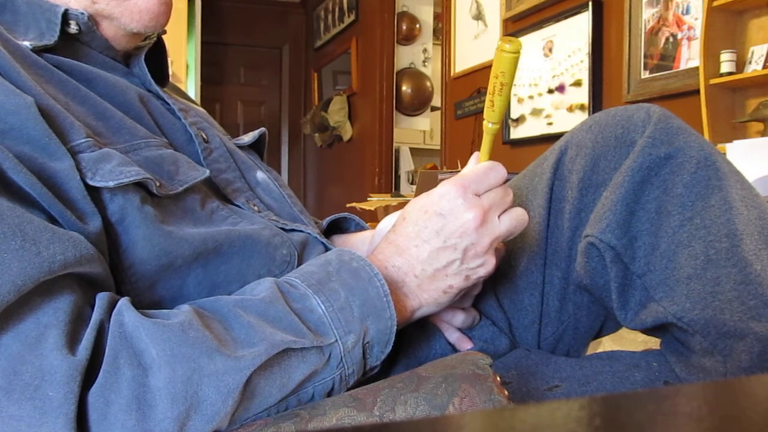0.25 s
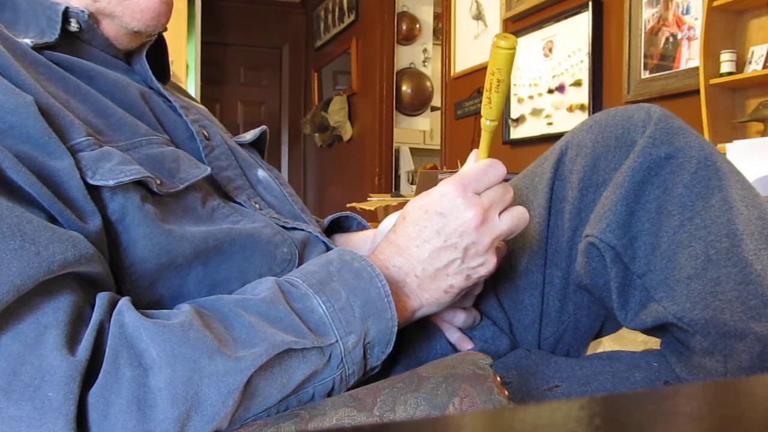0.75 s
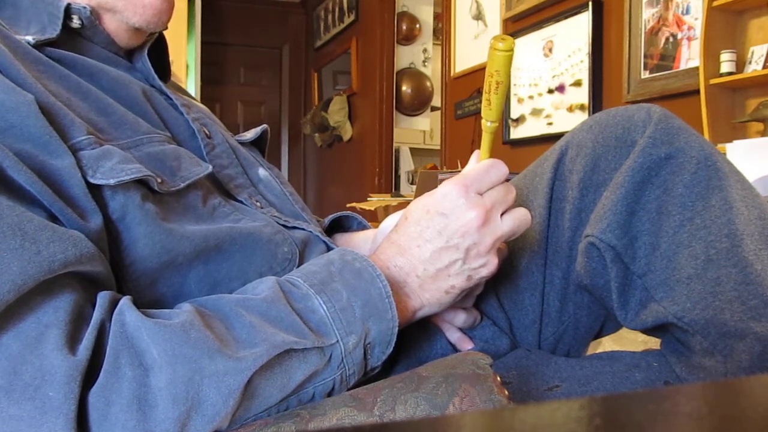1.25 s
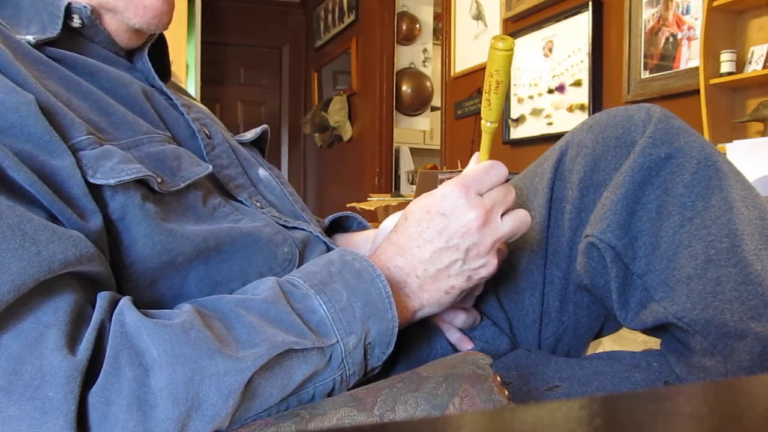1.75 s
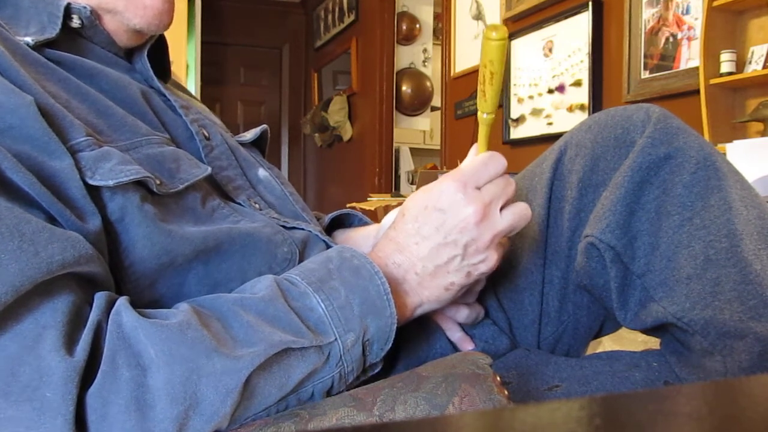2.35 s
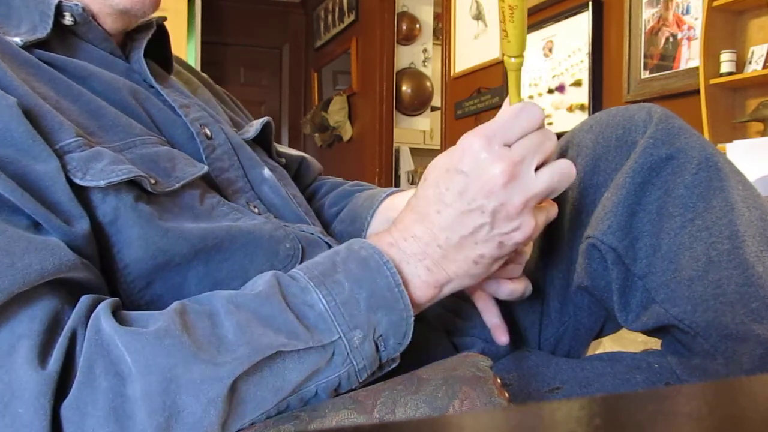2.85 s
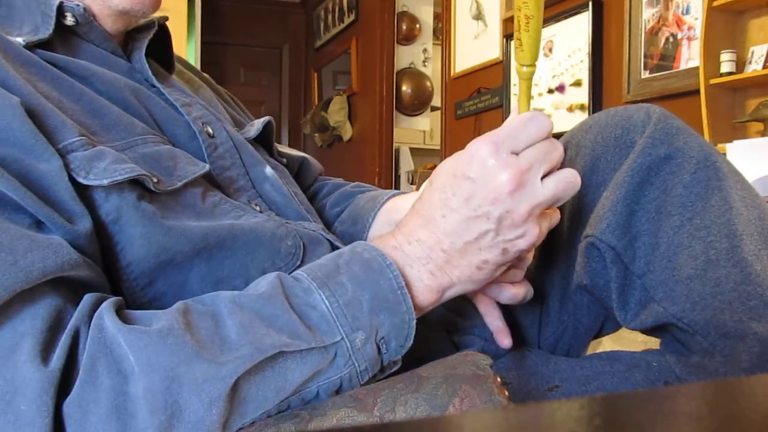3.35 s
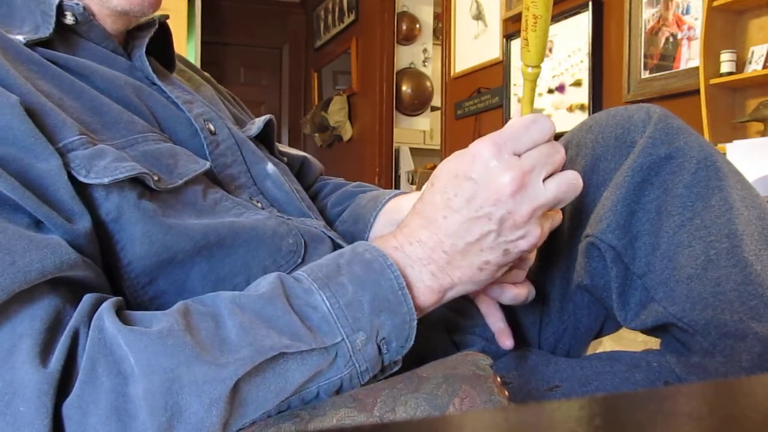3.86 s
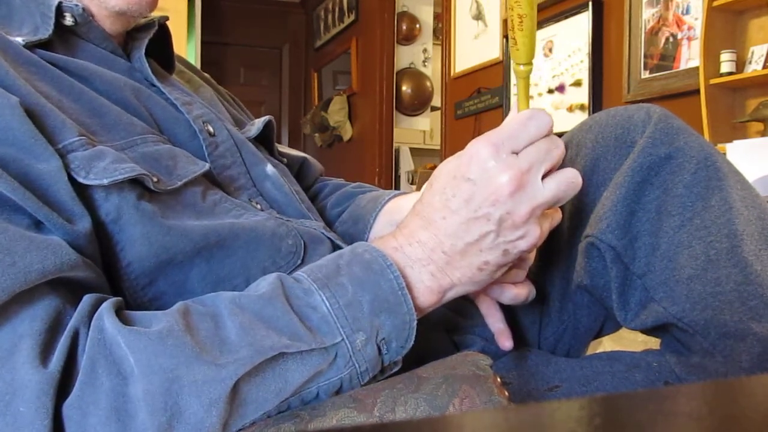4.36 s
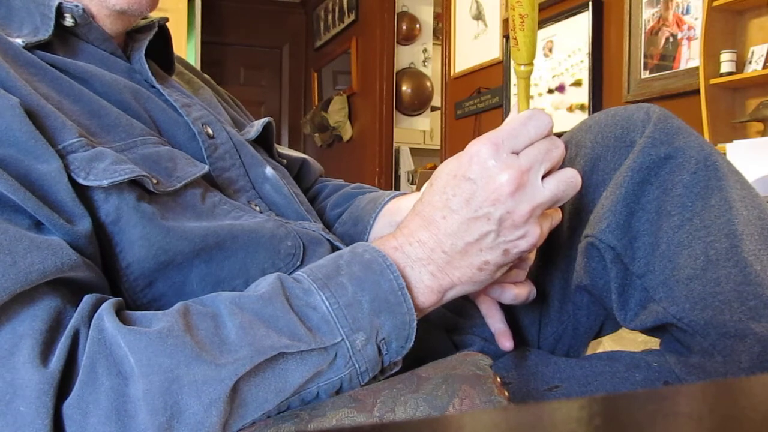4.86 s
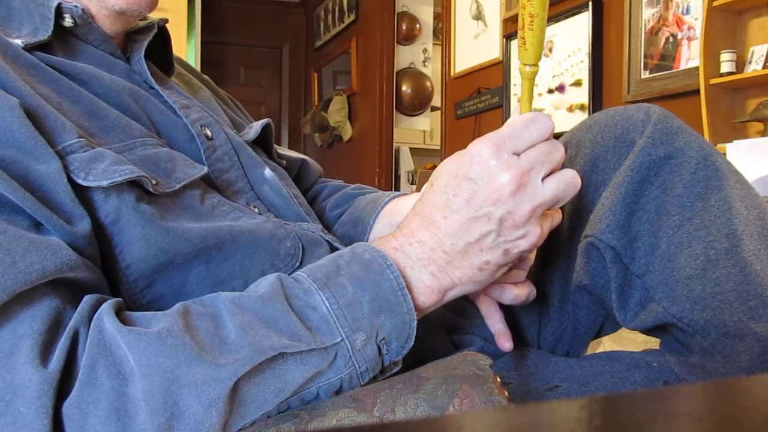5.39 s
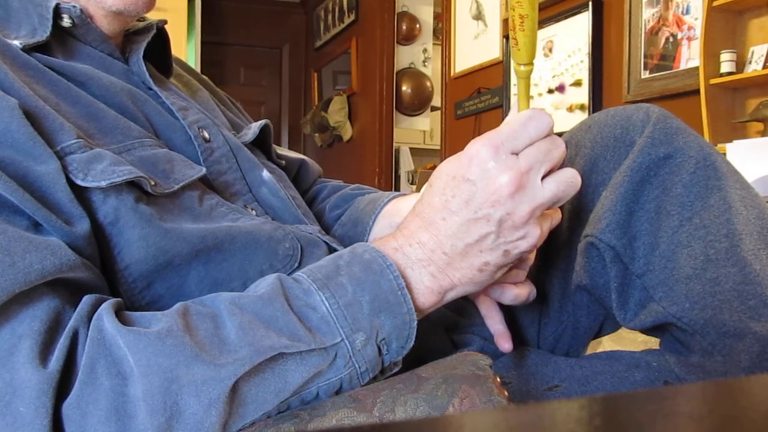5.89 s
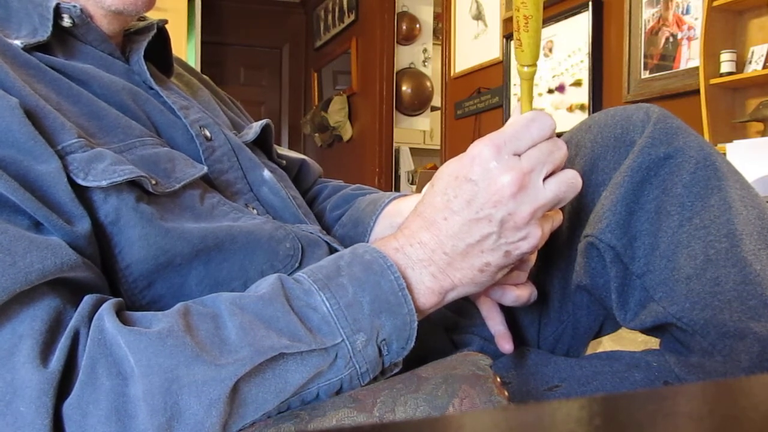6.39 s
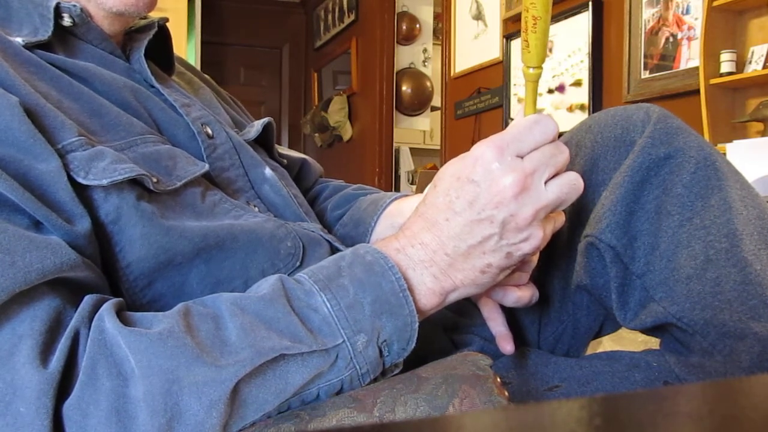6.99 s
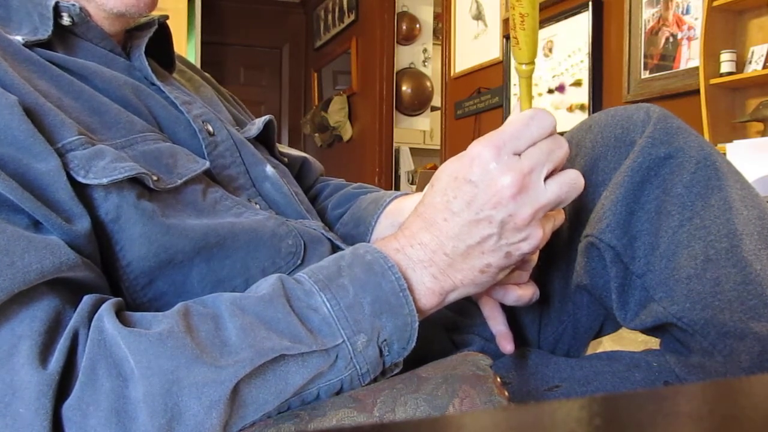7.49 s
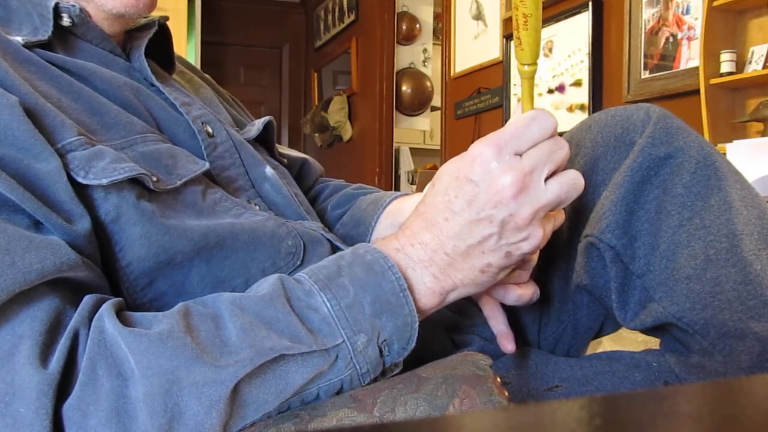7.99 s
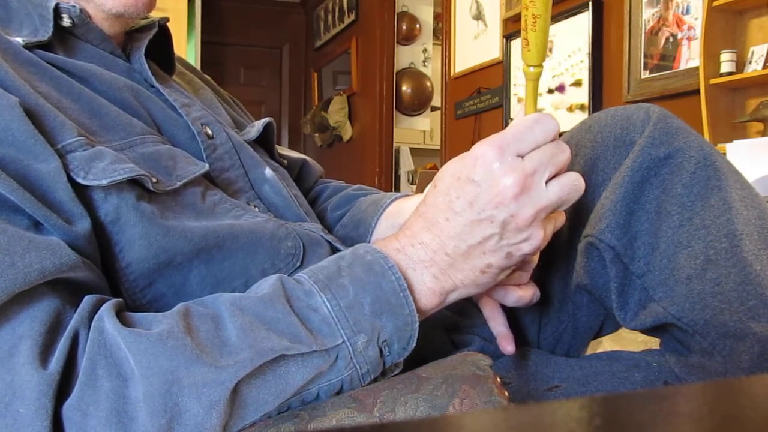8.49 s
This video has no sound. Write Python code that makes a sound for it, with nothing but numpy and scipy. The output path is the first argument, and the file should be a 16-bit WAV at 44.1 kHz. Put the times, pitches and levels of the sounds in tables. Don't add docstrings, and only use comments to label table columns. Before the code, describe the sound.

Close stereo pickup of a friction turkey call indoors. Two abrupt, nasal clucks come at once, followed by a faint-starting purr that swells, a soft rustle of cloth, then four more grainy, stuttering purrs, the last one weaker. Short room reverberation follows each stroke over steady low hum, thin whines and light hiss.

```python
import sys
import numpy as np
from scipy import signal
from scipy.fft import rfft, irfft, next_fast_len
from scipy.io import wavfile
from scipy.ndimage import uniform_filter1d, map_coordinates

SR = 44100
rng = np.random.default_rng(int(sys.argv[2]) if len(sys.argv) > 2 else 0)


def file_out(sig):
    cols = np.atleast_2d(sig).T
    lim = np.clip(cols, -1, 1)
    pcm = np.round(lim * 32767).astype(np.int16)
    wavfile.write(sys.argv[1], SR, pcm)


def ratio_of_db(decibels):
    return 10 ** (np.asarray(decibels, float) / 20)


N = 385434
TIME = np.arange(N) / SR

# start_s, fundamental_db, third_harmonic_db, brightness_db, rasp_db
STROKES = [
    (0, 6, -1, 0, -24),
    (0.299, 6.5, 0, 1.5, -19.5),
    (1.4, 12, 2, 1, -17.5),
    (1.859, 13.5, 5.5, -1, -18),
    (3.102, 4, -0.5, -1.5, -20.5),
    (4.8, 2, -1, -2, -26),
    (6.5, 1.5, -1, -3, -25),
    (8.1, 1, -1, -4.5, -26.5),
]


def unit(x):
    return x / np.sqrt(np.mean(x ** 2) + 1e-20)


def along(points, hz):
    f, v = np.transpose(points)
    return np.interp(np.log(hz + 1), np.log(f + 1), v)


def wobble(rate_hz):
    knots = rng.standard_normal(int(N * rate_hz / SR) + 4)
    return map_coordinates(knots, [TIME * rate_hz])


def filtered(x, response):
    m = next_fast_len(N + 8192)
    return irfft(rfft(x, m) * response(np.fft.rfftfreq(m, 1 / SR)), m)[..., :N]


def resonant(modes):
    def response(f):
        total = 0
        for k, (centre, width, db) in enumerate(modes):
            resonator = 1j * f * width / (centre * centre - f * f + 1j * f * width)
            total = total + (-1) ** k * ratio_of_db(db) * resonator
        return total
    return response


def shaped(points):
    return lambda hz: ratio_of_db(along(points, hz))


def hump(s, rise_ms, fall_ms):
    n = np.arange(max(round(s * SR) - 2600, 0), min(round(s * SR) + 2600, N))
    u = (n / SR - s) * 1000
    u = u / np.where(u < 0, rise_ms, fall_ms)
    return n, u, 2.0 ** -(u * u)


def noise(response, alike):
    def split(hz):
        turn = np.arccos(np.clip(along(alike, hz), 0, 1)) / 2
        return response(hz) * np.array([np.cos(turn), np.sin(turn)])
    mid, side = filtered(rng.standard_normal((2, N)), split)
    return unit(np.array([mid + side, mid - side]))


def stroke_index():
    return np.searchsorted(np.array(STROKES)[:, 0], TIME, "right") - 1


def room_tone():
    # time_s, gain_db
    gain_curve = [(0, -4.5), (0.14, -10), (1.02, -8), (2.72, 0), (8.74, 0)]
    # hz, db_per_hz
    rumble_shape = [(15, -48), (25, -18.5), (49, -9.5), (86, -14.5), (108, -8.5), (145, -4.5), (231, -0.5),
                    (286, -7.5), (361, -9.5), (492, -6), (539, -10.5), (912, -22), (1000, -24), (1300, -54),
                    (2200, -120)]
    # hz, db_per_hz
    hiss_shape = [(410, -43), (700, -2.5), (961, -5.5), (993, -6), (1030, -2), (1110, -6), (1290, -5),
                  (1490, -4.5), (2150, -4.5), (4380, -9.5), (5750, -11), (7720, -20.5), (9500, -20.5),
                  (12400, -56.5), (20900, -120)]
    # hz, db_per_hz
    port_shape = [(8500, -28), (9600, -8), (10100, 6), (10600, -5), (11000, 6), (11400, -4), (11900, 4),
                  (12250, -1.5), (12900, -3), (13500, -4), (14200, -14), (15000, -21), (15400, -9.5),
                  (15700, -18)]
    # hz, rms_db
    whine_tones = [(931.3, -70), (1055, -69.5), (1330, -72.5), (2094, -71), (3268, -75.5), (5916, -81),
                   (7865, -107.5), (10104, -81)]
    # hz, width_hz, level_db
    hum_modes = [(59.9, 2.5, -54.5), (117.9, 11, -59.5), (186.4, 5.4, -68), (235.7, 10, -55.5),
                 (403.6, 15, -64)]
    # hz, coherence (0-1)
    alike = [(60, 0.39), (180, 0.82), (550, 0.64), (1650, 0.14), (4970, 0.029), (15000, 0.11)]
    # hz, left_minus_right_db
    lean = [(60, -2.0), (180, -1.5), (550, -1.5), (1650, 3), (4970, 1), (9500, 1), (13000, 0)]

    gain_db = np.interp(TIME, *np.transpose(gain_curve))
    rumble = ratio_of_db(0.74 * wobble(7.8)) * noise(shaped(rumble_shape), alike)
    hum = ratio_of_db(-5.5) * noise(resonant(hum_modes), [(100, 0.94)])
    hiss = ratio_of_db(10.0 + 0.95 * wobble(8.1)) * noise(shaped(hiss_shape), alike)
    hiss = hiss + ratio_of_db(-1.5) * noise(shaped(port_shape), alike)
    whine = np.zeros(N)
    for hz, db in whine_tones:
        flicker_db = 2.2 * wobble(5)
        whine += ratio_of_db(db + 67 + flicker_db) * np.sin(2 * np.pi * hz * TIME + 0.6 * wobble(10.0))
    tone = ratio_of_db(-50.5 + gain_db) * (rumble + hum) + ratio_of_db(-63.5 + gain_db) * (hiss + whine)
    return filtered(tone, lambda hz: ratio_of_db(along(lean, hz) * np.array([[.5], [-.5]])))


def squeals():
    # peak_s, level_db, rise_ms, fall_ms, pitch_hz
    squeal_notes = [
        (0.0218, -10.5, 3.2, 1.8, 952),
        (0.4163, -6, 4.1, 1.3, 1010),
    ]
    out = np.zeros(N)
    for s, db, rise, fall, hz in squeal_notes:
        n, _, bell = hump(s, rise, fall)
        octave = 0.38 * bell * np.sin(4 * np.pi * hz * n / SR)
        out[n] += ratio_of_db(db) * bell * (np.sin(2 * np.pi * hz * n / SR) + octave)
    return out


def bursts():
    # peak_s, level_db, rise_ms, fall_ms, slip_rate_hz
    cluck_slips = [
        (0.024, -6.5, 1.5, 11, 700),
        (0.026, -9, 3.4, 2.8, 683),
        (0.048, -13, 11.5, 11, 705),
        (0.072, -18, 7.2, 5.9, 669.4),
        (0.421, -8, 1.4, 7.8, 736),
        (0.4341, -12.5, 11, 12, 728),
        (0.4473, -14, 2.8, 2.86, 670),
    ]
    # peak_s, level_db, fall_ms, gripped_slip_rate_hz
    sudden_catches = [(1.5883, -48, 17, 763), (1.622, -36, 9.1, 765), (1.7813, -35.5, 17, 805.5),
                      (1.8982, -25.5, 9.7, 795), (1.9358, -23.5, 6.2, 809.3), (1.9784, -27, 15, 850),
                      (2.003, -37.5, 16.96, 877.2), (2.0164, -15, 8.3, 791.5), (2.06, -16.5, 3.5, 830),
                      (3.3173, -28, 12.6, 714.3), (3.3542, -19.5, 14.98, 728.2), (3.371, -19, 3.65, 787),
                      (3.4292, -23, 16.5, 786.1), (3.466, -14, 10.3, 773.4), (3.554, -15.5, 9.5, 791.7),
                      (3.594, -11.5, 9, 790.5), (3.601, -13.5, 3.7, 795.6), (3.682, -12.5, 7.3, 823),
                      (3.7211, -10.5, 5.9, 771.7), (3.7712, -18, 9.8, 838.8), (3.8227, -21, 7.9, 837),
                      (5.1328, -14.5, 15.06, 740.7), (5.2515, -15.5, 7.3, 796.5), (5.2806, -18, 5.1, 823),
              (5.2956, -23.5, 16.7, 841.6), (5.3581, -16, 5.5, 825.3), (5.3908, -10.5, 17, 707.5),
              (5.4026, -21, 9.3, 741), (5.424, -19, 4.26, 829), (5.4622, -12, 14.72, 761.2),
              (5.4928, -11, 3.5, 781.7), (5.5156, -13, 3.6, 787.7), (5.5266, -33.5, 5.9, 779.4),
              (5.553, -10, 8.2, 771.6), (5.5926, -8.5, 8.7, 716.7),
                      (6.7229, -21.5, 3.7, 771.5), (6.7553, -18, 7.1, 747.3), (6.764, -18, 5.6, 755.6),
            (6.8013, -15, 8.8, 696), (6.9094, -18, 9.8, 773), (6.9422, -15, 17, 787),
            (6.962, -17.5, 13.3, 789.8), (6.987, -28.5, 2, 794.6), (7.04, -11.3, 17, 705),
            (7.1226, -9, 8.5, 733.6), (7.1598, -9.5, 11.1, 771.7), (7.2425, -27.5, 5, 791),
            (8.2772, -31, 3.8, 642), (8.286, -28, 5.5, 643), (8.3215, -29.5, 9.4, 750),
            (8.3639, -30, 5.1, 781), (8.3872, -21, 4.7, 670), (8.4057, -28.5, 8, 729),
            (8.481, -23.5, 15.6, 773), (8.6224, -11.5, 15.9, 695.4)]
    # peak_s, level_db, half_width_ms, slip_rate_hz
    glide_swells = [(1.5733, -39.5, 7.4, 684), (1.65, -42.5, 9.2, 814.8), (1.6841, -34, 7.9, 810.8),
                    (1.715, -46, 15, 859.6), (1.725, -36, 9.1, 824.1), (1.7486, -41.5, 10.9, 846),
                    (1.821, -51.5, 9.8, 818.6), (1.8884, -34, 12.7, 829.6), (3.3381, -24, 15.6, 778),
                    (3.4604, -32, 8.1, 846.6), (3.8188, -15.5, 8.6, 863), (5.0063, -32, 6.6, 782.6),
                    (5.0306, -19.5, 8.2, 717), (5.054, -21.5, 15, 798.5), (5.0785, -18.5, 9.6, 742.2),
                    (5.1714, -14.5, 11.7, 743.6), (5.2719, -13.5, 14.5, 785), (5.5065, -13, 7.3, 772),
                    (6.687, -32.5, 8.2, 774), (6.731, -31, 6.7, 780), (6.842, -16, 7.6, 768),
                    (6.9138, -23.5, 16.4, 830), (7.0063, -32, 14.6, 781.5), (7.0754, -13.5, 11, 788.5),
                    (7.1925, -15.5, 10.5, 790),
                    (8.302, -36, 12, 682), (8.3915, -24.5, 15.5, 724), (8.42, -23, 13.7, 758),
                   (8.451, -36, 14, 827), (8.5185, -17, 11.5, 745.4), (8.549, -26.5, 12, 816.5),
                   (8.5926, -25.5, 8, 827), (8.717, -14.5, 12, 777.6)]

    free_hz = 889.4
    catch_rise_ms = 4.3
    catch_let_go, glide_let_go = .65, .5
    clucks = [(s, db, rise, fall, hz, hz + 5.07) for s, db, rise, fall, hz in cluck_slips]
    catches = [(s, db, catch_rise_ms, fall, hz, hz + catch_let_go * (free_hz - hz))
               for s, db, fall, hz in sudden_catches]
    glides = [(s, db, half, half, hz, hz + glide_let_go * (free_hz - hz))
              for s, db, half, hz in glide_swells]
    return clucks + catches + glides


def slip_motion():
    power, rate = np.full(N, 1e-12), np.full(N, 790e-12)
    for s, db, rise, fall, grip_hz, slack_hz in bursts():
        n, u, bell = hump(s, rise, fall)
        slack = (1 - bell) * np.where(u < 0, .7, 1.35)
        burst_power = (ratio_of_db(db) * bell) ** 2
        power[n] += burst_power
        rate[n] += burst_power * (grip_hz + (slack_hz - grip_hz) * slack)
    hz = uniform_filter1d(rate / power, size=60) * (1 + .008 * wobble(220))
    return np.sqrt(power), 2 * np.pi * np.cumsum(hz) / SR


def pot_buzz(force, phase, drag, bite):
    # hz, level_db
    pot = [(740, -23.5), (860, -12.5), (1300, 4.5), (1600, 0), (1960, -7.5), (2120, -6.5), (2450, -13),
           (2850, -22.5), (3300, -25), (3800, -29.5), (4420, -26), (5100, -39), (7000, -41), (9200, -46.5),
           (12000, -60.5)]
    # pitch_hz, level_db, unsteadiness (0-1)
    slate_note = [(981, -29, 0.13), (903, -17, 0), (1061, -6.5, 0.07), (1027, -6.5, 0.11), (1000, -17.5, 0),
                  (1000, -20, 0.13), (1010, -18, 0.07), (1026, -19, 0.21)]
    # hz, width_hz, level_db
    slate_ring = [(4430, 260, 8), (11600, 2400, 12)]

    stroke = stroke_index()
    first_db, third_db, bright_db = np.array(STROKES)[stroke, 1:4].T
    note_hz, note_db, unsteady = np.array(slate_note)[stroke].T
    shake = .008 * wobble(700)

    def harmonic(k, db):
        radiated_db = along(pot, k * hz) - along(pot, 2 * hz)
        flicker_db = (1.3 if k == 2 else 3.2) * wobble(170)
        return ratio_of_db(radiated_db + db + flicker_db) * np.cos(k * phase + k * k * (1.3 + shake))

    hz = np.gradient(phase) * SR / (2 * np.pi)
    bite_db = 20 * np.log10(bite)
    upper = harmonic(2, 0) + harmonic(3, third_db + 1.7 * bite_db)
    for k in range(4, 18):
        upper = upper + harmonic(k, bright_db + bite_db)
    note_phase = 2 * np.pi * np.cumsum(note_hz * (1 + unsteady * wobble(60))) / SR
    note = ratio_of_db(note_db + 1.5 * wobble(70)) * np.cos(note_phase)
    buzz = force * upper * (1 + 0.44 * bite ** 2 * note) + drag * (harmonic(1, first_db) + note)
    return buzz + filtered((stroke < 2) * force * upper, resonant(slate_ring))


def grit_rasp(force, phase, sway, drag, bite):
    # hz, width_hz, level_db
    slate_modes = [(830, 130, -17), (970, 60, 5), (1319, 100, 4.5)]
    # hz, width_hz, level_db
    rim_modes = [(1500, 420, -1.5), (2110, 200, 0), (2470, 120, -0.5)]
    # hz, level_db
    grit = [(600, -69.5), (1900, -42), (3200, -31.5), (3800, -36), (4400, -37), (5100, -36), (6500, -38),
            (8500, -44), (10000, -51), (15000, -80)]

    bright_db, rasp_db = np.array(STROKES)[stroke_index(), 3:5].T
    gate = (.5 + .5 * np.cos(phase)) ** 2
    scrape = ratio_of_db(rasp_db + 1.5 * wobble(150)) * unit(gate * rng.standard_normal(N))
    slate = filtered(drag * scrape, lambda f: ratio_of_db(23) * resonant(slate_modes)(f) / np.sqrt(1 + (f / 1500) ** 8))
    rim = filtered(sway * scrape, lambda f: ratio_of_db(18.5) * resonant(rim_modes)(f) ** 2)
    air = filtered(ratio_of_db(bright_db) * force * bite * scrape, lambda f: ratio_of_db(along(grit, f) + 31.5))
    return slate + rim + air


def striker():
    force, phase = slip_motion()
    sway = signal.lfilter([.003], [1, -.997], force)
    drag = 0.088 * ((sway + 0.58 * force) / 0.17) ** 0.61
    drag = drag * (sway + force) / (sway + force + 0.00067)
    bite = (force / 0.12) ** 0.099
    sound = pot_buzz(force, phase, drag, bite) + grit_rasp(force, phase, sway, drag, bite)
    return filtered(sound, lambda f: 1 / np.sqrt(1 + (715 / (f + 1)) ** 24))


def taps():
    # time_s, peak_db
    contacts = [
        (0.33, -28),
        (1.453, -32),
        (3.186, -27.5),
        (4.948, -33.5),
        (4.956, -34.5),
    ]
    blows = np.zeros(N)
    for s, db in contacts:
        blows[round(s * SR):][:14] = ratio_of_db(db + 14) * np.hanning(14)
    return ratio_of_db(-4.5) * filtered(blows, resonant([(1020, 84, 7.5), (1325, 130, 6.0), (2000, 200, -22.5)]))


def direct_sound(call):
    # hz, lag_rad
    port_lag = [(300, 0.0734), (800, 0.38), (1500, 0.47), (2400, 1.1), (5000, 1.36), (10000, 1.9)]
    # delay_ms, left_db, right_db
    near_surfaces = [(1.1, -28, -41.5), (2.3, -34.5, -37), (4.1, -24, -21), (6.7, -41, -21.5)]

    def path(hz):
        lag = np.exp(-.5j * along(port_lag, hz) * np.array([[1], [-1]]))
        near = 1
        for ms, left_db, right_db in near_surfaces:
            near = near + ratio_of_db([[left_db], [right_db]]) * np.exp(-2j * np.pi * hz * ms / 1000)
        return lag * near
    return ratio_of_db([[-1.3], [1.3]]) * filtered(call, path)


def room(x):
    # hz, t60_s
    decay = [(600, 0.48), (1600, 0.29), (2400, 0.43), (4400, 0.39), (10000, 0.24)]
    out, which = np.zeros((2, N + SR)), stroke_index()
    for k in range(len(STROKES)):
        n = np.flatnonzero(which == k)
        hz, t, z = signal.stft(rng.standard_normal((2, SR // 2)), SR, nperseg=256)
        tail = signal.istft(z * ratio_of_db(-60 * t / along(decay, hz)[:, None]), SR, nperseg=256)[1]
        tail = tail * np.clip(np.arange(tail.shape[1]) / SR / 0.014, 0, 1)
        tail = tail + .5 * tail[::-1]
        wet = signal.fftconvolve(x[None, n], tail / np.linalg.norm(tail[0]), axes=1)
        out[:, n[0]:n[0] + wet.shape[1]] += ratio_of_db(-13.5) * wet
    return out[:, :N]


def sleeve():
    # time_s, level_db
    rustle = [
        (2.299, -71),
        (2.5, -57.5),
        (2.62, -52.5),
        (2.75, -65.5),
        (3.002, -70),
    ]
    s, db = np.transpose(rustle)
    weave = [(400, -31), (650, 8.5), (1000, -6.5), (3000, -6.0), (7000, -12.5), (15000, -37.5)]  # hz, db
    cloth = noise(shaped(weave), [(1000, .6)])
    return ratio_of_db(np.interp(TIME, s, db, -140, -140) + 2.7 * wobble(40)) * cloth


def scene():
    call = squeals() + striker() + taps()
    return room_tone() + direct_sound(call) + room(call) + sleeve()


def band_limit(x):
    return signal.sosfilt(signal.butter(12, 15700, fs=SR, output="sos"), x)


def record(dry):
    held = dry / (1 + np.abs(dry) ** 12) ** (1 / 12)
    held = filtered(held, lambda hz: hz < 15720)
    return band_limit(held)


dry = scene()
out = record(dry)
file_out(out)
```